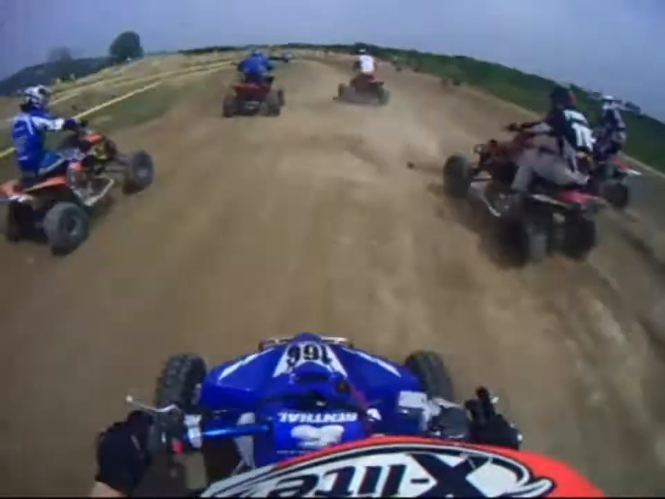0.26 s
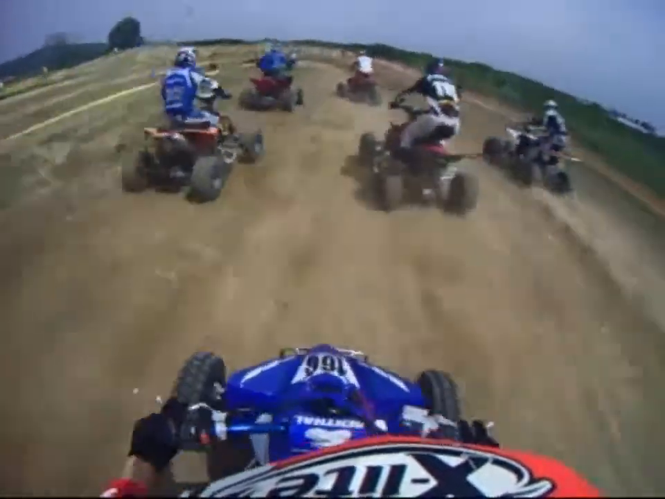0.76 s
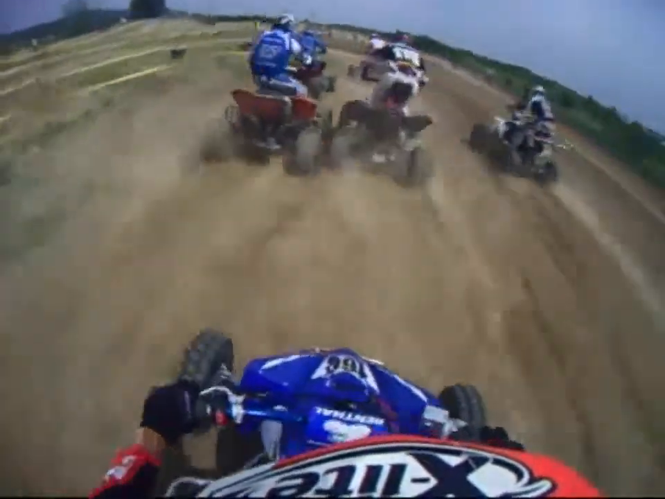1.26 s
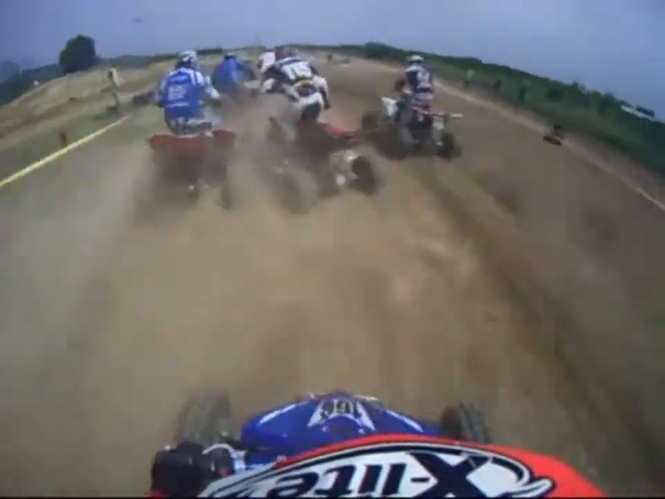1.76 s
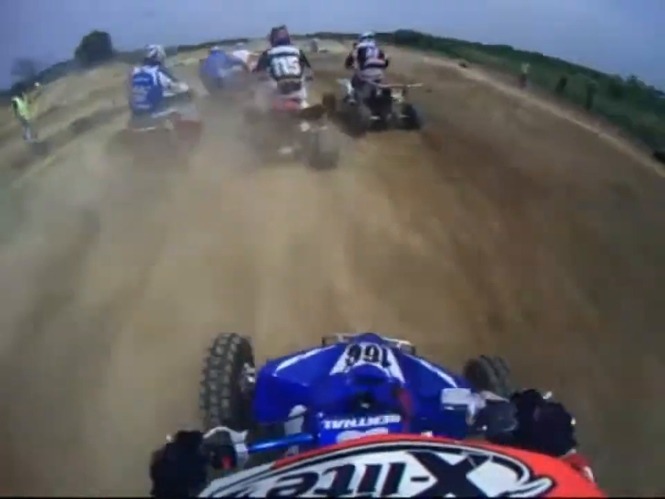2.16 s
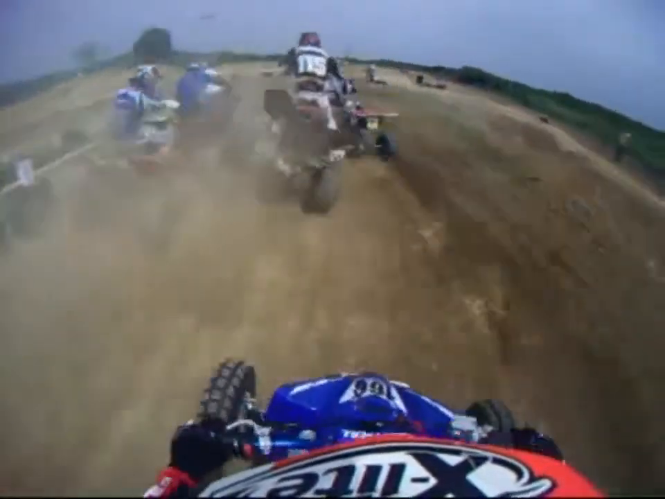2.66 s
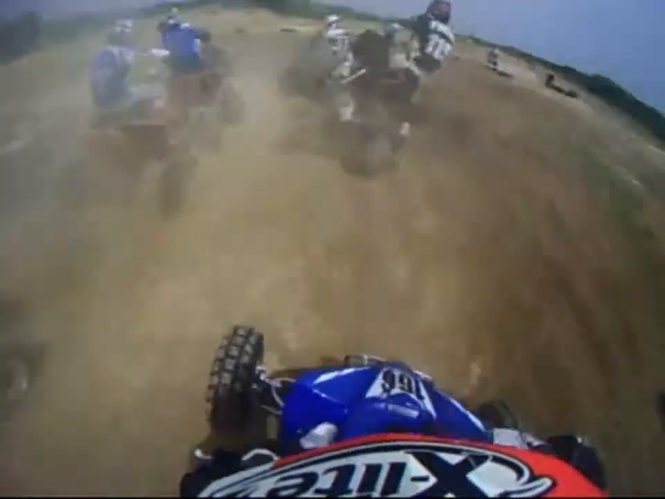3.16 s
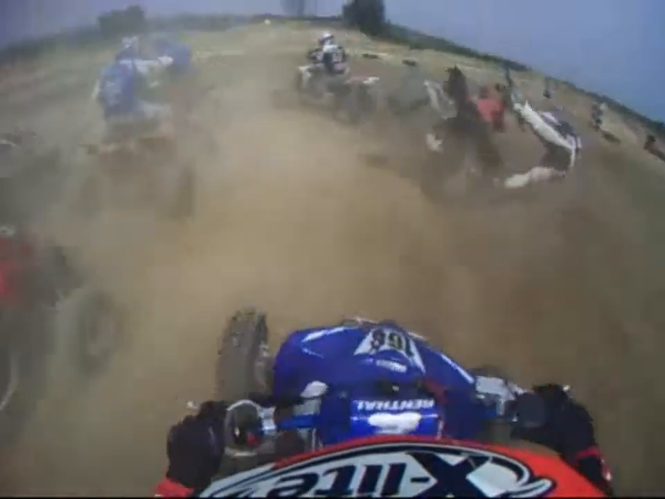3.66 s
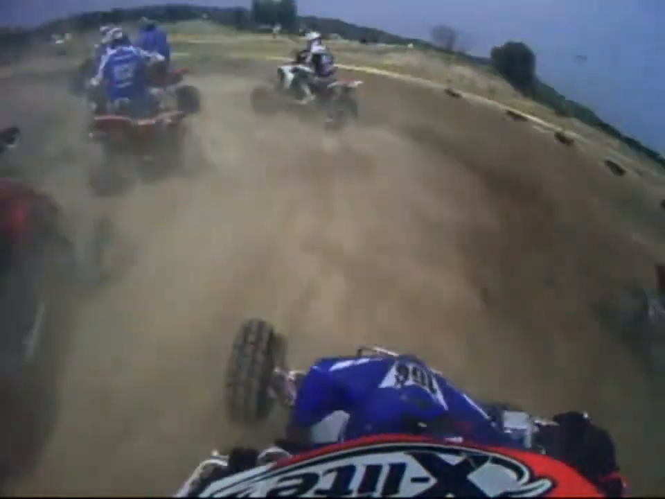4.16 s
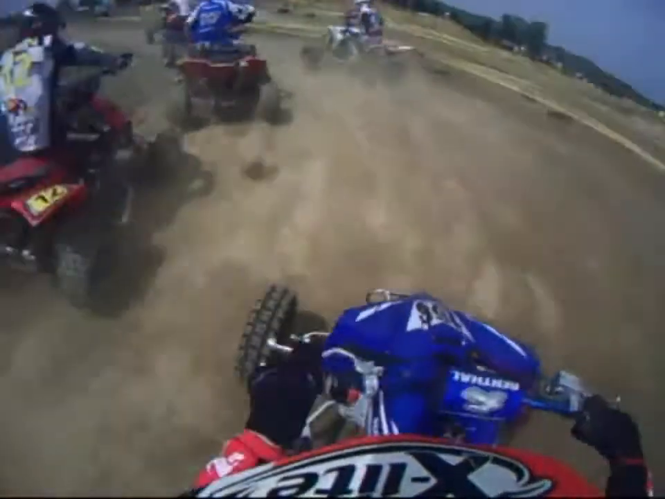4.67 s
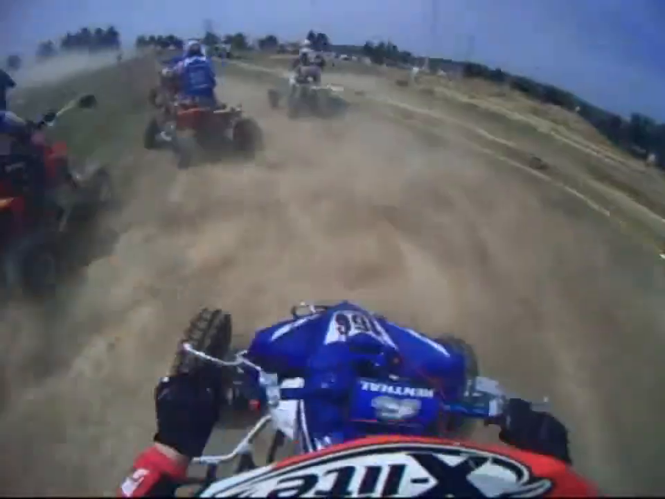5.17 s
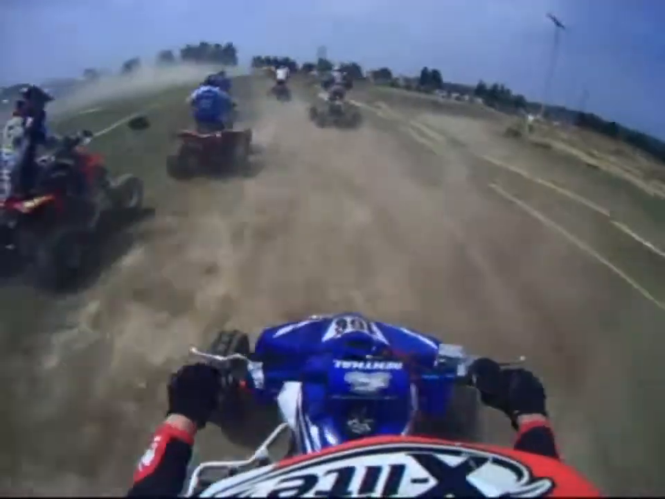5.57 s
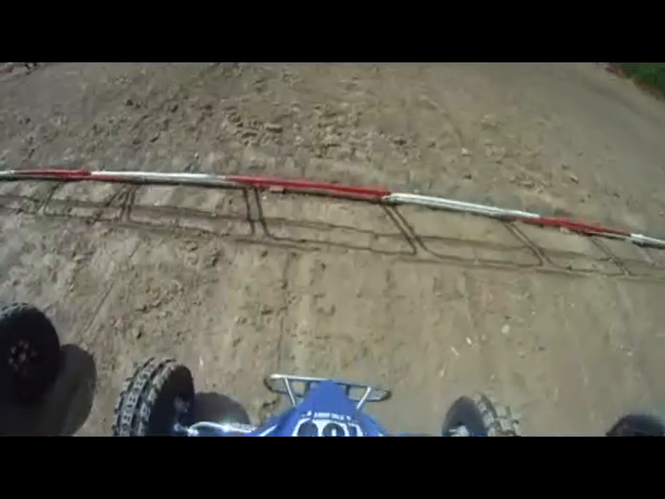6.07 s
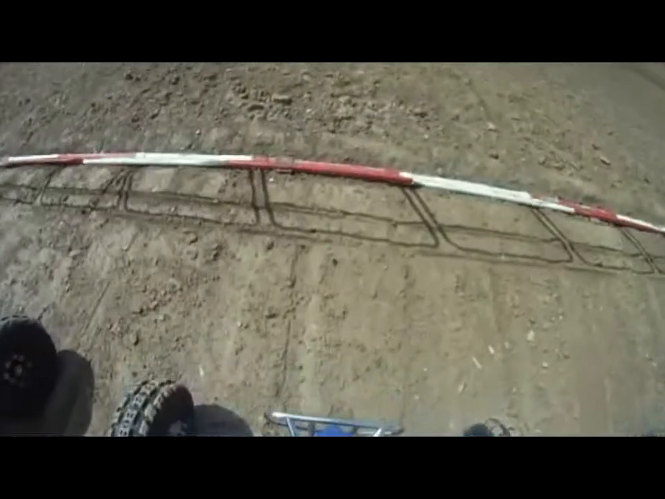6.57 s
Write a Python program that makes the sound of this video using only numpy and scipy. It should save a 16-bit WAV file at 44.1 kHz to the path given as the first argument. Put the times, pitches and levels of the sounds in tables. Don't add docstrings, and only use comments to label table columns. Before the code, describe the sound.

Onboard a racing quad outdoors, heard through a small, band-limited helmet camera. From 0 to 0.7 s the single-cylinder engine barks loudly, with sharp ringing cracks, while nearby quads hiss, drone and blip. Low jolts thud at about 0.6 and 0.7 s. From 0.9 to 3 s everything is quieter and duller: a muffled pack drone, wind rumble, brief knocks around 1.6 and 1.9 s, another jolt at 2.4 s, and the rider's engine sinking in pitch. From 3.1 s short throttle bursts return, with uneven pops and a neighbour's blip near 3.7 s. Between 4.2 and 5.8 s the engine revs repeatedly, raspy and crackling, with stronger gusts and a jolt at 4.9 s. A tiny silence falls around 5.9 s. Then a much louder, coarse, overloaded sound bursts in: several engines revving close together, thumping and rasping, with the sharpest bark near 6.8 s.

```python
import sys
import numpy as np
from scipy import signal
from scipy.fft import rfft, irfft, next_fast_len
from scipy.io import wavfile
from scipy.ndimage import uniform_filter1d

SR = 44100
rng = np.random.default_rng(int(sys.argv[2]) if len(sys.argv) > 2 else 0)


def invert_db(level):
    return 10 ** (np.asarray(level, dtype=float) / 20)


def master(y):
    cut = np.clip(np.atleast_2d(y).T, -1, 1)
    pcm = np.round(cut * 32767)
    wavfile.write(sys.argv[1], SR, pcm.astype(np.int16))


N = 300762

# t/s, firing rate f/Hz
RIDE_SPEED = [(0.0, 62.59), (0.58, 68.87), (1.3, 67.42), (1.6, 62.3), (1.92, 63.32), (2.36, 43.25),
              (2.84, 36.94), (3.12, 40.76), (3.34, 33.34), (3.46, 63.28), (3.7, 62.98), (3.88, 39.0),
              (4.2, 64.24), (4.36, 75.68), (4.48, 60.77), (4.7, 65.3), (4.98, 78.77), (5.87, 53.65)]
GATE_SPEED = [
    (5.94, 54.5),
    (6.2, 57),
    (6.3, 73),
    (6.44, 69),
    (6.55, 63),
    (6.82, 64),
]
# t/s, peak level/dB
RIDE_CRACKS = [(.0925, -8), (.2607, -16), (.3239, -7.5), (.415, -10.5), (.4711, -0.5), (.5284, -15.5),
               (.6855, -9), (.6995, -11.5), (1.5064, -23.5), (1.8559, -19.5), (3.3141, -20.5),
               (3.3702, -14), (3.4146, -18.5), (3.5784, -18), (3.8327, -24), (3.906, -21.5), (3.9501, -21),
               (3.9728, -18), (4.0148, -17), (4.0736, -17), (4.3657, -21.5), (4.6105, -17.5),
               (4.7775, -21.5), (4.8342, -12.5), (4.9033, -16), (5.0745, -15.5), (5.1145, -43),
               (5.1821, -16.5), (5.2859, -14.5)]
GATE_CRACKS = [(5.9489, -5), (6.0853, -9), (6.1735, -3), (6.26, -5), (6.2895, -4), (6.3021, -4),
               (6.4201, -10), (6.534, -5), (6.6295, -1), (6.7831, 0)]
# t/s, peak level/dB
RIDE_KNOCKS = [(0.0441, -21), (1.624, -25), (1.6464, -31), (1.6621, -19.5), (1.9665, -26.5),
               (1.9981, -23.5), (3.0114, -36), (3.051, -28.5), (3.084, -29.5), (3.1552, -27), (3.3428, -16),
               (3.4628, -16), (4.0939, -19.5), (4.2656, -18.5), (4.9516, -16), (5.058, -22.5)]
GATE_KNOCKS = [(5.9855, -7), (6.1926, 1), (6.2108, -5), (6.2277, -2), (6.2444, -3), (6.274, -6),
               (6.8009, -3), (6.8165, -2)]
# f/Hz, level/dB per Hz
JET_EDGE = [(600, -39), (1500, -0.5), (2900, 2), (3500, 2), (4000, -11), (4600, -7), (5500, -14.5),
            (7000, -58)]
CRACK_THUMP_DB, KNOCK_THUMP_DB = -17.5, -6


def own_engine(speed, cracks, knocks, rasp_db, thump_db, boom_db, edge_db, shake_db, mode_hz, housing):
    ring, mid, low = housing
    when = firings(np.arange(N) / SR, speed, [s for s, db in cracks + knocks])
    chance = rng.standard_normal((N // 300, 3))[:len(when)].T

    boom = colour(spikes(when, invert_db(chance[2] + 25)), low)
    turns = np.interp(np.arange(N) / SR, when, np.arange(len(when)))
    boom = boom + invert_db(shake_db) * np.sin(2 * np.pi * turns)

    when = when + 0.00017 * chance[0]
    at = np.clip((when * SR).astype(int), 0, N - 1)
    rasp = rasp_db[at] + 22.5 + 1.3 * chance[1]
    thump = thump_db[at] + 26.0 + 0.28 * chance[2]
    for rows, rel_db in ((cracks, CRACK_THUMP_DB), (knocks, KNOCK_THUMP_DB)):
        for s, db in rows:
            k = np.argmin(abs(when - s))
            when[k], rasp[k], thump[k] = s, db + 8.0, db + rel_db + 16.5

    blows = spikes(when - .0008, invert_db(rasp))
    gas = gas_puffs(blows, edge_db, mode_hz, ring)
    step = spikes(when - .001, invert_db(thump))
    rough = puff(step, .001, 0.0038) * rng.standard_normal(N)
    knock = invert_db(-3) * step + invert_db(-20.5) * rough
    return gas + colour(knock, mid) + invert_db(boom_db) * boom


def gas_puffs(blows, edge_db, mode_hz, ring):
    ringing = colour(rng.standard_normal(N), ring)
    envelope = abs(signal.hilbert(ringing, next_fast_len(N))[:N])
    ringing = ringing / (.2 + uniform_filter1d(envelope, int(.0008 * SR)))
    wandering_hz = mode_hz * (1 + 0.028 * walk(70))
    mode = np.sin(2 * np.pi * np.cumsum(wandering_hz) / SR)
    gas = puff(blows, .0025, .0032) * (.42 * ringing + .72 * mode)
    gas = gas + colour(invert_db(-8) * blows, ring)
    edge = colour(rng.standard_normal(N), JET_EDGE)
    gas = gas + invert_db(edge_db) * puff(blows, 0.0021, 0.0028) * edge
    return gas + 0.17 * np.roll(gas, int(0.006 * SR))


def firings(t, speed, marks):
    turns = np.cumsum(curve(t, speed)[0]) / SR
    when = np.interp(np.arange(int(turns[-1])), turns, t)
    late, picked, shifts = 0, [], []
    for s in sorted(marks):
        picked.append(np.argmin(abs(when + late - s)))
        late = s - when[picked[-1]]
        shifts.append(late)
    return when + np.interp(np.arange(len(when)), picked, shifts)


# start t/s, length t/s, bark level/dB, thump against bark level/dB
RIDE_PULLS = [(0, 0.34, -36, -12.5), (0.369, 0.17, -28, -4.5), (.54, 0.11, -40, 1.5),
              (1.613, 0.11, -44, 7.5), (1.85, 0.031, -34, 1), (1.945, 0.095, -55, 11.5),
              (3.1, 0.18, -48, 5), (3.31, 0.16, -31, -0.5), (3.69, 0.1, -39, -1), (3.91, 0.34, -38.5, 1.5),
              (4.202, 0.33, -42.5, 0), (4.553, .14, -36.5, -2.5), (4.824, 0.19, -33.5, -4.5),
              (5.045, 0.19, -33.5, -2.5), (5.215, 0.36, -36, 2.5), (5.553, 0.3, -44.5, 7)]
GATE_PULLS = [
    (5.9, 0.129, -27.5, 8),
    (6.17, 0.097, -30, 1),
    (6.34, .2, -32, -1),
    (6.55, 0.0811, -27, -8),
    (6.66, .1, -33, -15),
    (6.78, .1, -19, -8),
]


def throttle(t, pulls):
    slow = t[::64]
    levels = []
    for start, length, db, rel_db in pulls:
        bark = swell(slow, start, length, db, rise=1500, fall=1500)
        levels.append([bark, bark + rel_db])
    bark, thump = np.max(levels, axis=0)
    return np.interp(t, slow, bark), np.interp(t, slow, thump)


RIVALS_HZ = [
    47.56,
    58.03,
    82.5,
]
# t/s, nearness level/dB, extra drone when heard from behind level/dB
RIDE_PACK = [(0, -33.5, 2), (.3, -30.5, -3), (0.509, -37, 3.5), (.6, -44, 4.5), (.86, -43, 7),
             (1.05, -45.5, 3.5), (1.5, -50, 9), (1.68, -45.5, 6), (2.1, -53, 12.5), (2.5, -52, 8),
             (3.2, -56, 17), (3.6, -52, 12), (3.73, -43, 6), (3.881, -50, 10.5), (4.199, -44.5, 6),
             (4.75, -46.5, 8.5), (5.3, -38, 4.5), (5.87, -41.5, 7)]
GATE_PACK = [(5.939, -17.5, 2.5), (6.0, -20, -3.5), (6.16, -20.5, 1), (6.2, -26, 2.5), (6.3, -22.5, -0.5),
             (6.34, -21, -3), (6.57, -18, -2.5), (6.66, -22.5, -4.5), (6.82, -19.5, 0.5)]


def pack(hiss_db, roar_db, drone_db, housing):
    ring, mid, low = housing
    beats = 0
    for mean_hz in RIVALS_HZ:
        hz = mean_hz * (1 + .09 * walk(2.2) + .006 * walk(30))
        turns = np.cumsum(hz) / SR
        when = np.flatnonzero(np.diff(np.floor(turns))) / SR
        size = invert_db(1.3 * rng.standard_normal(N // 300)[:len(when)])
        beats = beats + invert_db(1.43 * walk(2.56)) * spikes(when, size)
    gas = (.75 + .55 * puff(beats, .0006, .004)) * rng.standard_normal(N)
    drone = colour(invert_db(20.5) * beats + .5 * rng.standard_normal(N), low)
    roar = colour(invert_db(17) * beats + 0.73 * gas, mid)
    hiss = invert_db(hiss_db + 1.8 + .8 * walk(20)) * colour(gas, ring)
    return hiss + invert_db(roar_db - 4.0) * roar + invert_db(drone_db - 1.0) * drone


# start t/s, top t/s, end t/s, top f/Hz, level/dB
RIDE_BLIPS = [
    (0.023, 0.171, 0.28, 70.2, -38),
    (0.407, 0.473, 0.47, 67.4, -37.5),
    (0.744, 0.798, 0.89, 69.7, -38),
    (3.681, 3.79, 3.81, 69.8, -39.5),
    (5.689, 5.801, 5.88, 67.7, -39.5),
]
GATE_BLIPS = [
    (6.06, 6.2, 6.21, 67, -30.5),
    (6.465, 6.65, 6.66, 64.5, -27),
    (6.725, 6.8, 5.9, 63.5, -29),
]


def neighbour(t, blips, order, climb_hz, next_db):
    out = np.zeros(N)
    wobble = [invert_db(1.5 * walk(25)) for k in range(2)]
    for start, top, end, top_hz, blip_db in blips:
        near = abs(t - (start + end) / 2) < (end - start) / 2 + .06
        u = t[near]
        hz = np.interp(u, [start, top], [top_hz - climb_hz, top_hz])
        hz = hz - 35 * np.maximum(u - top, 0)
        phase = 2 * np.pi * np.cumsum(hz) / SR
        db = swell(u, start, end - start, blip_db, rise=897.5, fall=897.5)
        for k in range(2):
            tone = np.sin((order + k) * phase)
            out[near] += 2 ** .5 * invert_db(db + k * next_db) * wobble[k][near] * tone
    return out


# t/s, peak level/dB
RIDE_GUSTS = [(0, -34), (.28, -45), (.49, -37), (.6, -35), (1.0, -45), (1.15, -35.5), (1.35, -36),
              (1.49, -45), (1.7, -39), (1.98, -41), (2.46, -35), (3.63, -44), (3.76, -47), (4.82, -35.5),
              (4.97, -32.5), (5.15, -39), (5.52, -31), (5.87, -35.5)]
GATE_GUSTS = [
    (5.95, -32),
    (6.18, -31),
    (6.575, -38),
    (6.82, -39),
]
# t/s, f/Hz, level/dB, time to fade by 60 dB t/s
JOLTS = [
    (0.591, 35, -17, 0.41),
    (.73, 29.2, -15.5, 0.19),
    (2.426, 40.26, -16.5, 0.22),
    (4.92, 34.8, -17.5, 0.31),
]


def wind(t, gusts, breeze_db):
    slow = t[::64]
    gust = np.max([swell(slow, s, 0, db, rise=154, fall=146.5) for s, db in gusts], axis=0)
    db = both(np.interp(t, slow, gust), breeze_db)
    rumble = colour(rng.standard_normal(N), [(5, -15.5), (20, 4), (40, 6), (70, -11), (120, -41.5)])
    out = invert_db(db + 2.3 * walk(11)) * rumble
    for s, hz, peak_db, t60 in JOLTS:
        u = np.maximum(t - s, 0)
        fade = (1 - np.exp(-u / 0.022)) * invert_db(-60 * u / t60)
        out = out + invert_db(peak_db) * fade * np.sin(2 * np.pi * hz * u)
    return out


# f/Hz, level/dB per Hz
RIDE_RING = [(880, -39), (1500, -5.5), (1890, -18.5), (2030, 1), (2230, -9.5), (2500, -3.5), (2900, -4.5),
             (3040, -15.5), (3520, -11.5), (3930, -21), (4530, -22.5), (5320, -42), (5640, -34),
             (5900, -57), (7670, -79), (13000, -120)]
GATE_RING = [(880, -42), (1500, -12), (1770, -20), (2080, -4), (2410, 1.5), (2570, -2), (2820, -18.5),
             (3090, -8), (3230, -29), (3380, -12), (3750, -11.5), (4140, -24), (4860, -19.5), (5900, -25),
             (7670, -59.5), (13000, -120)]
RIDE_MID = [(190, -19.5), (330, -1.5), (741, -2), (1050, -5), (1180, -2.5), (1280, -14.5), (1430, -7),
            (1800, -8.5), (2340, -44), (3960, -120)]
GATE_MID = [(190, -38.5), (330, -14.5), (372, -1), (429, -2), (491, -4.5), (554, -12.5), (621, -2.5),
            (736, -15.5), (957, 3), (1150, -12.5), (1560, -9.5), (1800, -14), (2340, -32.5), (3960, -120)]
RIDE_LOW = [(35, -39.5), (60, -1.5), (75, -1), (145, 5), (183, 0.5), (249, -4), (281, -3.5), (387, -7),
            (450, -19.5), (580, -46.5), (990, -120)]
GATE_LOW = [(29, -30), (50, 0), (92, -6.5), (134, 5.5), (178, -6), (252, -6), (306, -11.5), (371, -14.5),
            (450, -27), (580, -39.5), (990, -120)]


def colour(x, points):
    hz, db = np.transpose(points)
    grid = np.maximum(np.arange(2049) * SR / 4096, 1)
    log_gain = np.interp(np.log(grid), np.log(hz), np.maximum(db, -70)) * np.log(10) / 20
    cepstrum = irfft(log_gain)
    cepstrum[1:2048] *= 2
    cepstrum[2049:] = 0
    taps = irfft(np.exp(rfft(cepstrum)))[:2048]
    return signal.fftconvolve(x, taps / np.sqrt(np.sum(taps ** 2)))[:N]


def walk(rate):
    k = int(SR / rate)
    steps = np.repeat(rng.standard_normal(N // k + 1), k)
    return 1.3 * uniform_filter1d(uniform_filter1d(steps, k), k)[:N]


def spikes(s, size):
    out = np.zeros(N)
    np.add.at(out, np.clip((s * SR).astype(int), 0, N - 1), size)
    return out


def puff(x, rise_s, fall_s):
    t = np.arange(2000) / SR
    return signal.fftconvolve(x, np.exp(-t / fall_s) * (1 - np.exp(-t / rise_s)))[:N]


def curve(t, rows):
    s, *columns = np.transpose(rows)
    return [np.interp(t, s, c) for c in columns]


def swell(t, start, length, db, rise, fall):
    return db - rise * np.maximum(start - t, 0) - fall * np.maximum(t - start - length, 0)


def both(a_db, b_db):
    return 10 * np.log10(invert_db(2 * a_db) + invert_db(2 * b_db))


def camera(t, speed, cracks, knocks, pulls, rivals, gusts, breeze_db, edge_db, shake_db, mode_hz, housing):
    bark, thump = throttle(t, pulls)
    near, dull = curve(t, rivals)
    rasp = both(bark, near - 4.5)
    drone = near + dull
    roar = near + 1 + (1 - 0.48) * dull
    boom = drone - 5.5 + 0.35 * np.clip(rasp - near, -10, 10)
    engine = own_engine(speed, cracks, knocks, rasp, both(thump, roar - 6), boom,
                        edge_db, shake_db, mode_hz, housing)
    hiss = both(near, bark - 15.5)
    return engine + pack(hiss, roar, drone, housing) + wind(t, gusts, breeze_db)


GATE_START_S = 5.942


def scene():
    t = np.arange(N) / SR
    ride = camera(t, RIDE_SPEED, RIDE_CRACKS, RIDE_KNOCKS, RIDE_PULLS, RIDE_PACK, RIDE_GUSTS,
                  breeze_db=-46, edge_db=-12.5, shake_db=-16, mode_hz=2472,
                  housing=(RIDE_RING, RIDE_MID, RIDE_LOW))
    ride = ride + neighbour(t, RIDE_BLIPS, order=4, climb_hz=8.24, next_db=-0.5)
    gate = camera(t, GATE_SPEED, GATE_CRACKS, GATE_KNOCKS, GATE_PULLS, GATE_PACK, GATE_GUSTS,
                  breeze_db=-40, edge_db=-25, shake_db=-9, mode_hz=2155,
                  housing=(GATE_RING, GATE_MID, GATE_LOW))
    gate = gate + neighbour(t, GATE_BLIPS, order=1, climb_hz=0.16, next_db=1)
    return np.where(t < GATE_START_S - .03, ride, gate)[None]


def band_limit(x):
    return signal.sosfilt(signal.butter(12, 16370, fs=SR, output="sos"), x)


def record(dry):
    t = np.arange(N) / SR
    smooth = signal.sosfilt(signal.ellip(10, .3, 90, 5610, fs=SR, output="sos"), dry[0])
    notched = signal.lfilter(*signal.iirnotch(3956, 4.5, SR), smooth)
    smooth = notched * 0.77 + .2 * smooth
    smooth = smooth + invert_db(-93) * rng.standard_normal(N)

    slow = np.clip(signal.resample_poly(dry[0], 40, 147), -.9, .9)
    held = signal.resample_poly(np.repeat(slow, 8), 147, 320)[:N]
    held = held * np.clip((t - GATE_START_S) / .001, 0, 1)
    held = signal.lfilter(*signal.butter(1, 15150, fs=SR), held)
    held = signal.sosfilt(signal.cheby2(12, 75, 15980, fs=SR, output="sos"), held)

    joined = smooth * (t < 5.869) + held
    return band_limit(joined[None])


dry = scene()
out = record(dry)
master(out)
```